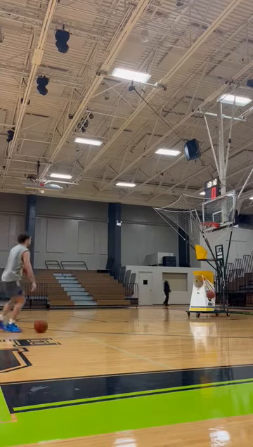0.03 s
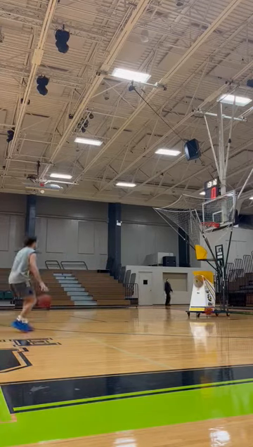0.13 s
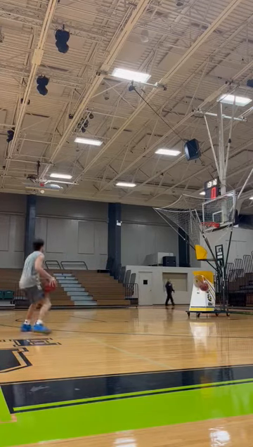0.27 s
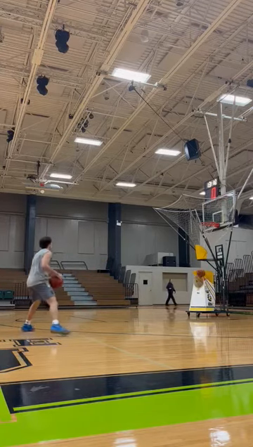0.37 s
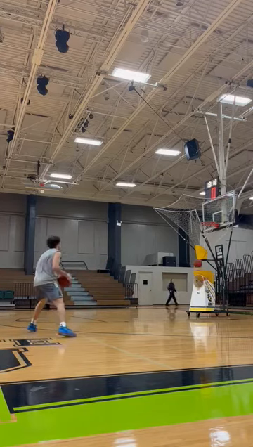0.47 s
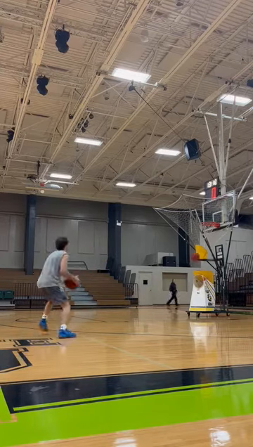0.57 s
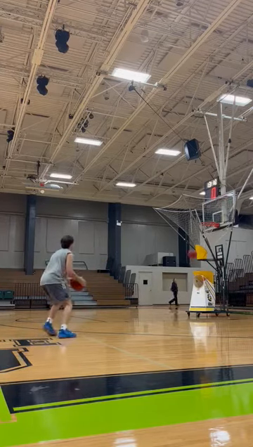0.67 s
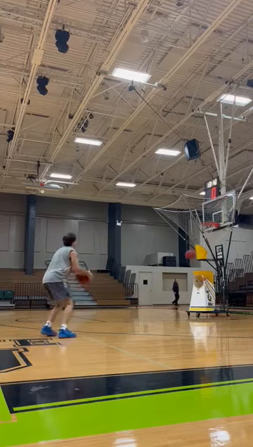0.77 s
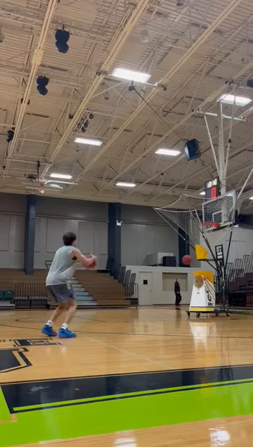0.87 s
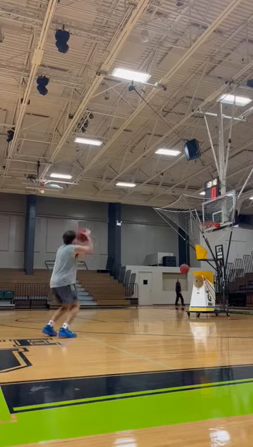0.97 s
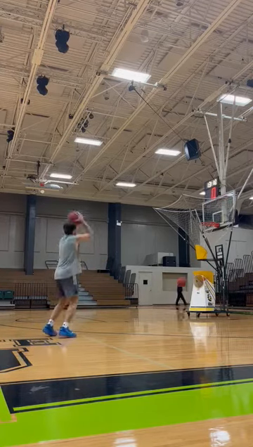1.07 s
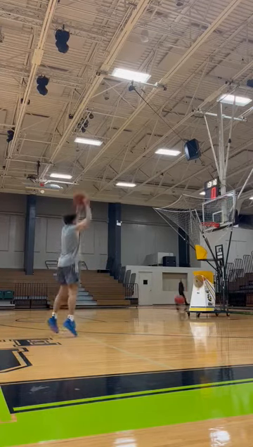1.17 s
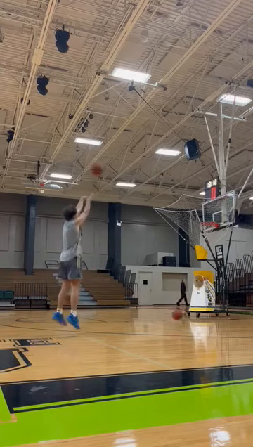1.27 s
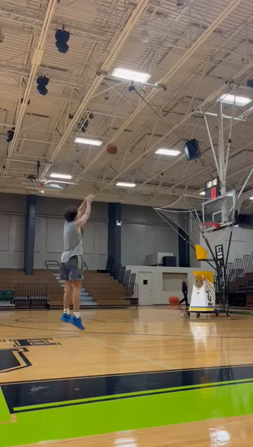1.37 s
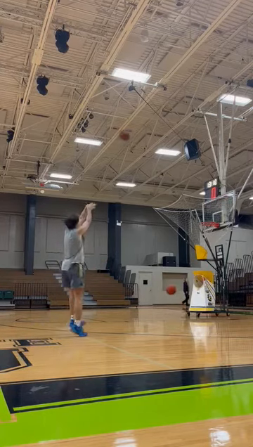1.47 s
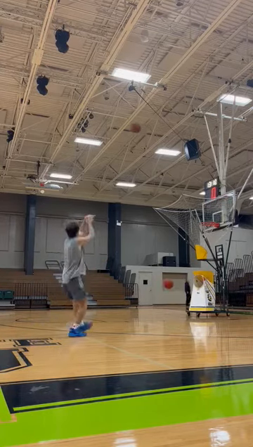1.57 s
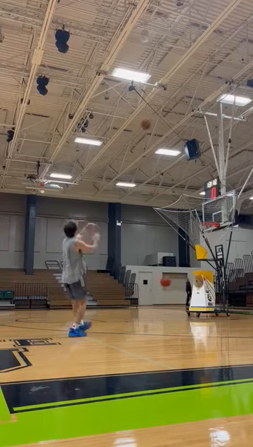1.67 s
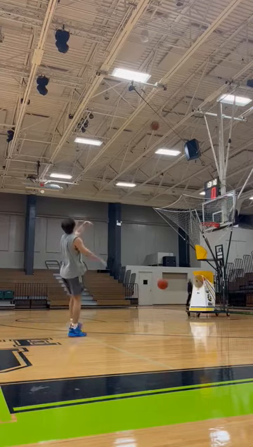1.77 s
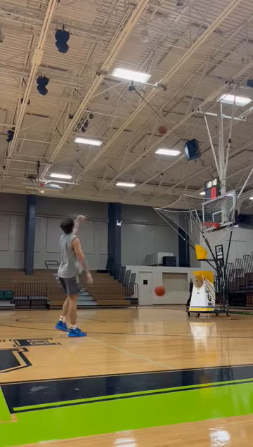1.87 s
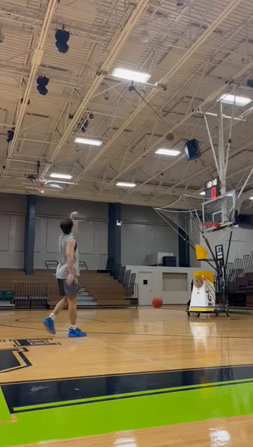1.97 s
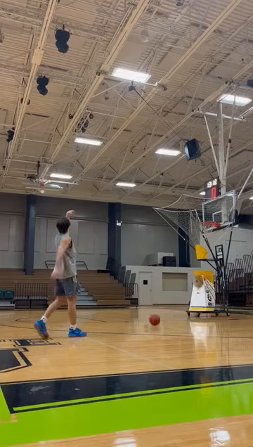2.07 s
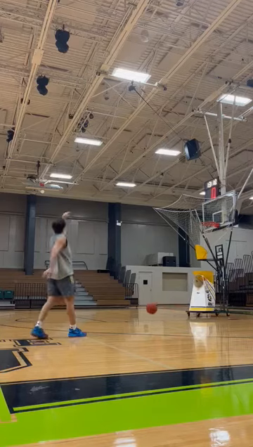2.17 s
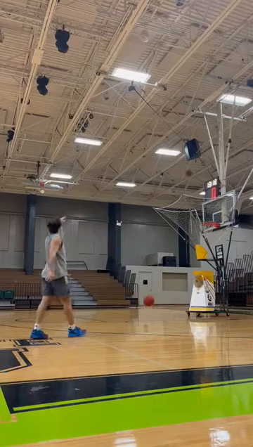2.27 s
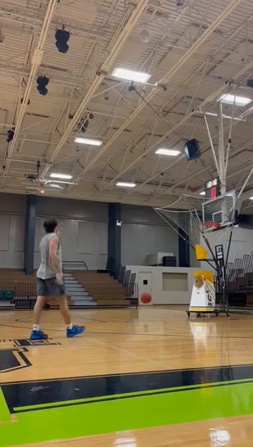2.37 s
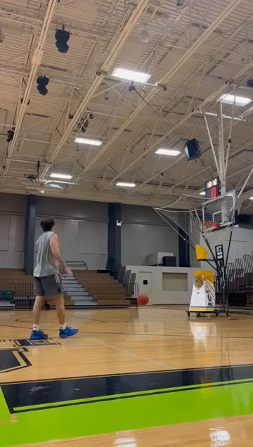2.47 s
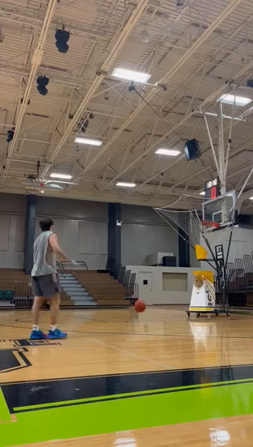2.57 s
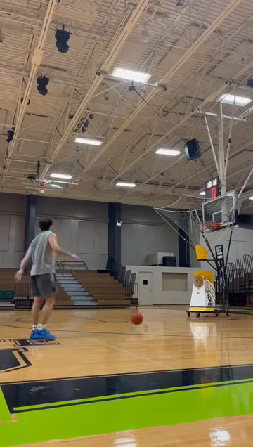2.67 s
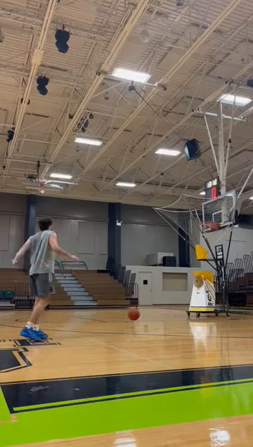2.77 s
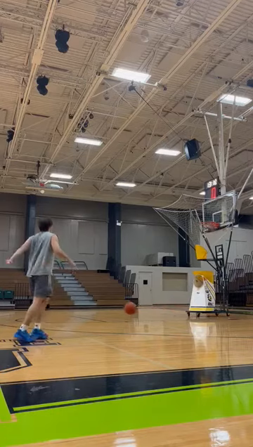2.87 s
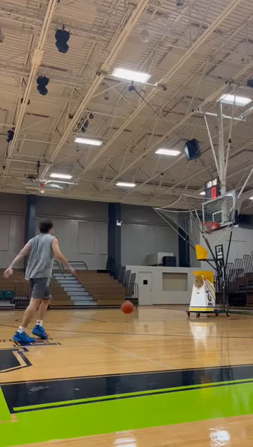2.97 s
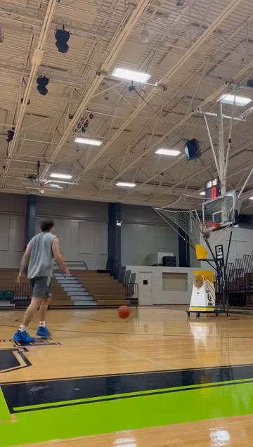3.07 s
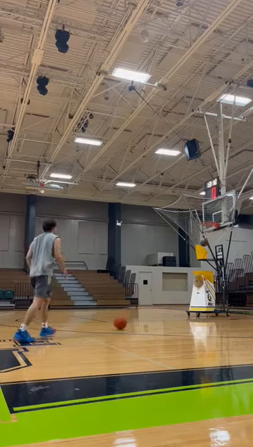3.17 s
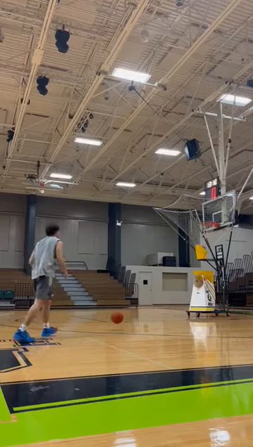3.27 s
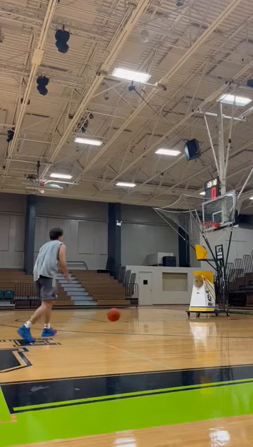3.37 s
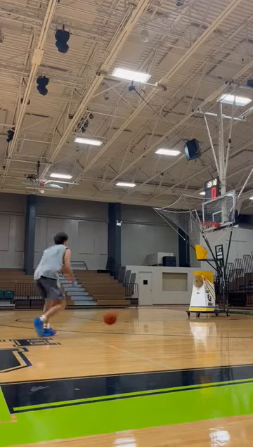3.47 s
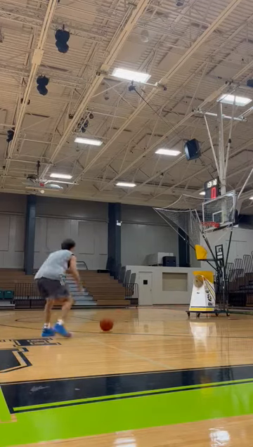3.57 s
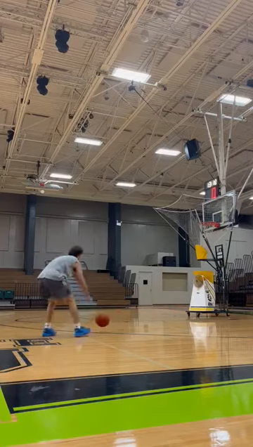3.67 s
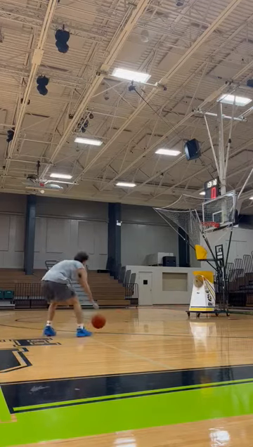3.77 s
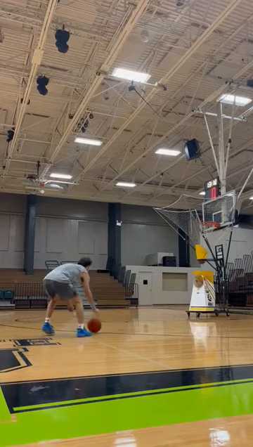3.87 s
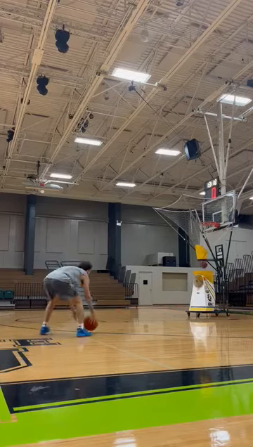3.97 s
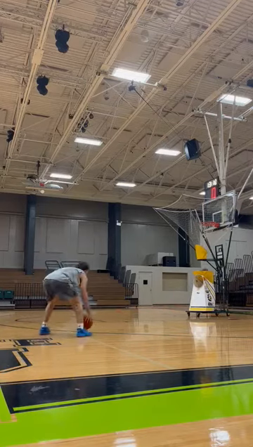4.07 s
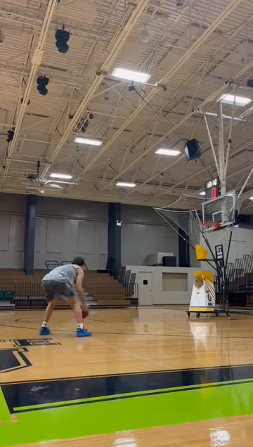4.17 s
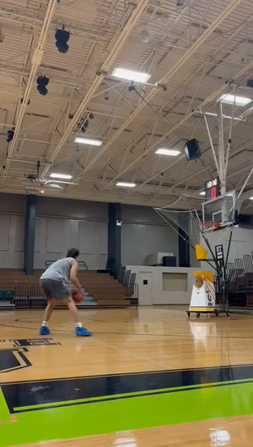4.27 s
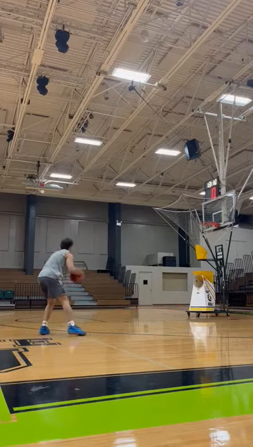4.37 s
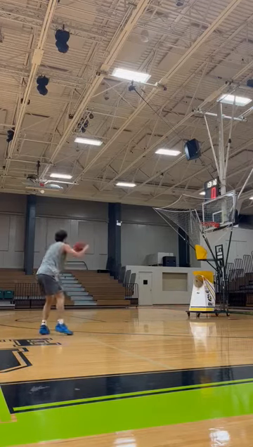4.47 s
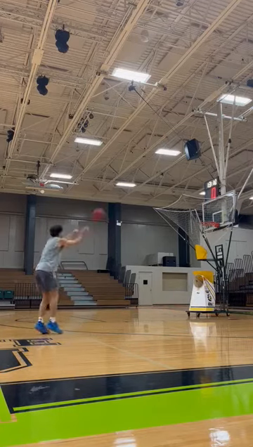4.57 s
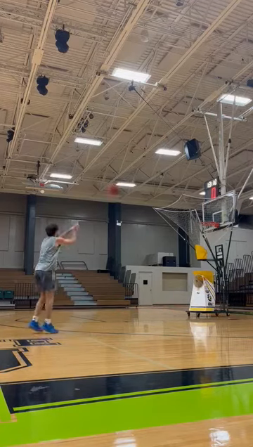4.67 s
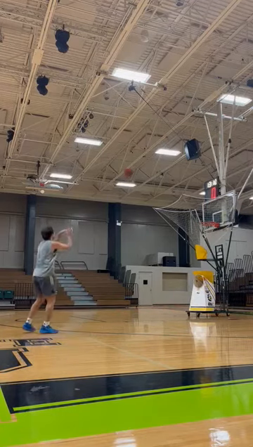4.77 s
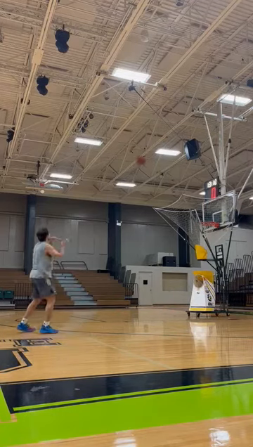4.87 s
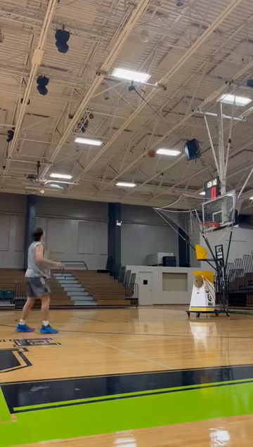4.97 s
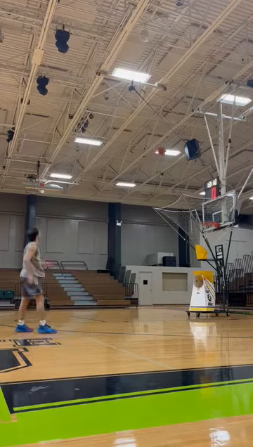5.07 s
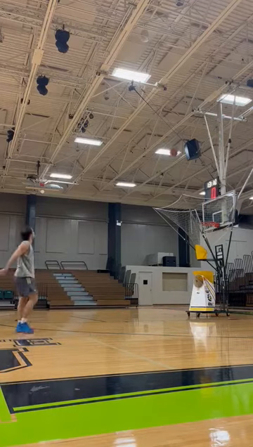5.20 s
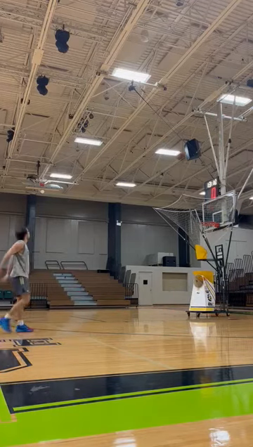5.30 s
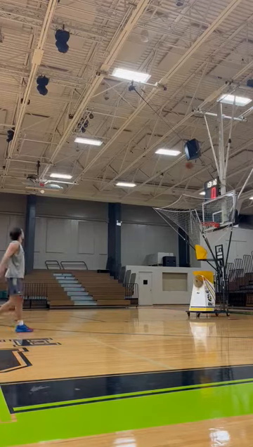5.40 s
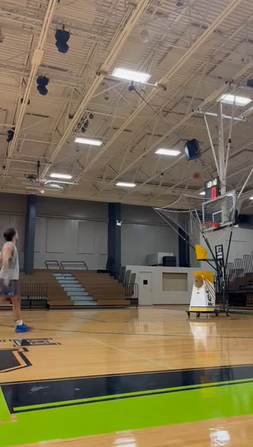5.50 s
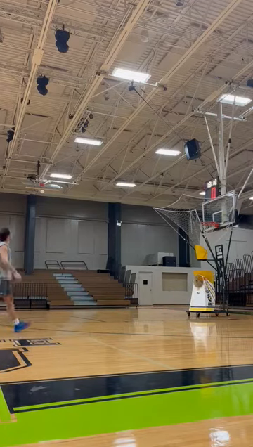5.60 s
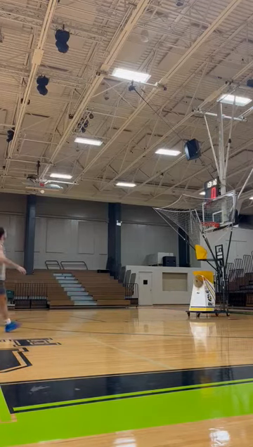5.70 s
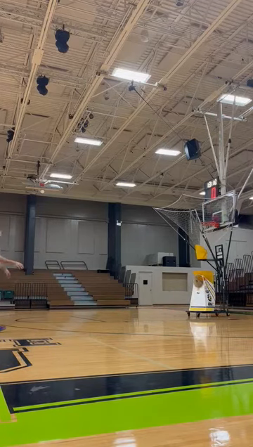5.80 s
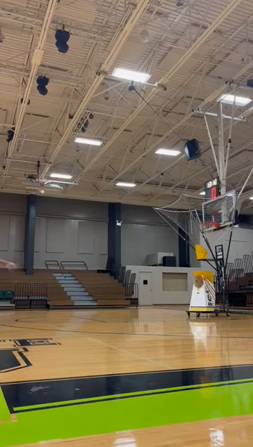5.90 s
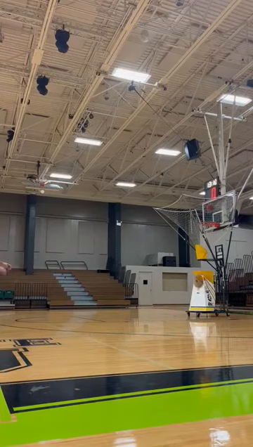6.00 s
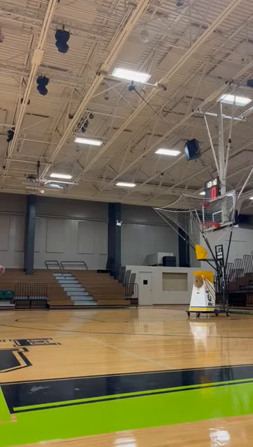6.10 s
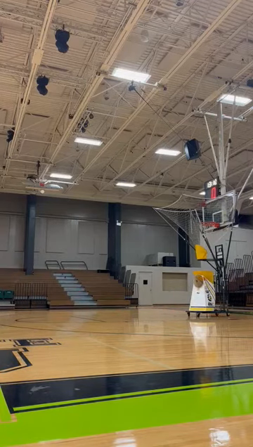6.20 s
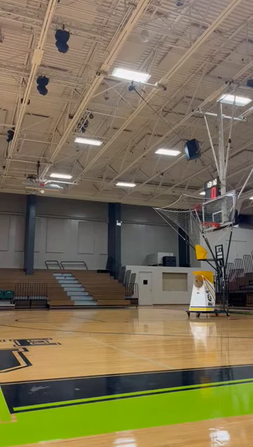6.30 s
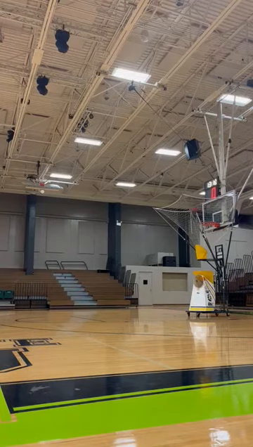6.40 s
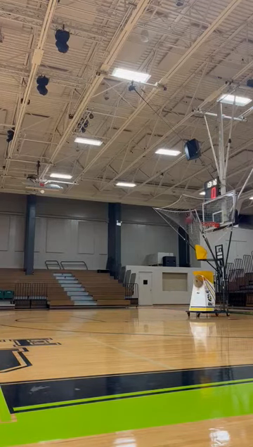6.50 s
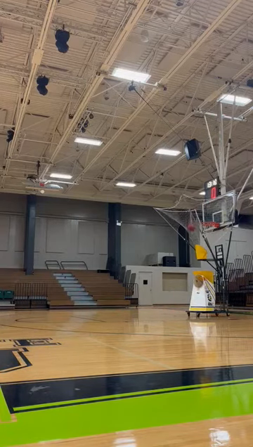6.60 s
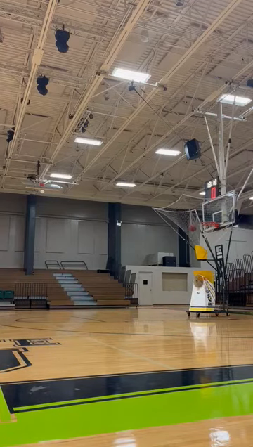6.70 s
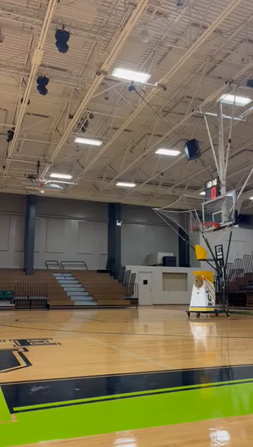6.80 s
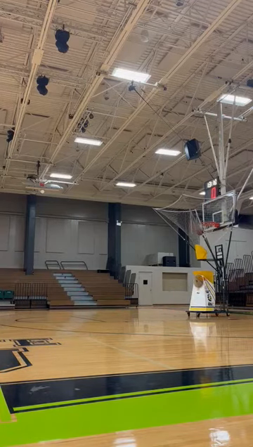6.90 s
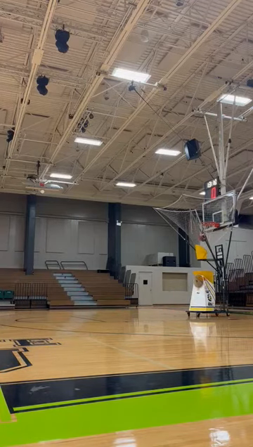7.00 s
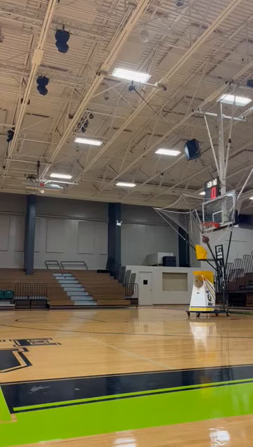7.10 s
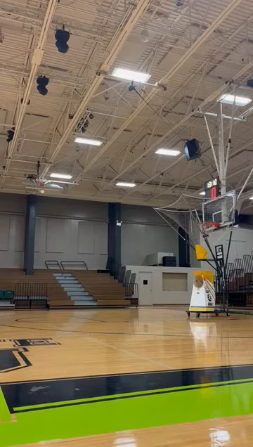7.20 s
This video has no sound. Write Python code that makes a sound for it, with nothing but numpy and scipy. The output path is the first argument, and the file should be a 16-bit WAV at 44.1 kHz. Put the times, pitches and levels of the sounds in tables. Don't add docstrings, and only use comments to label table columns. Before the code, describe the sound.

In a large, humming gym, a dribbled ball booms and echoes, a loose ball bounces farther off, and rubber soles chirp between soft footfalls.

```python
import sys
import numpy as np
from scipy import signal
from scipy.fft import rfft, irfft, next_fast_len
from scipy.io import wavfile
from scipy.ndimage import uniform_filter1d

SR = 44100
rng = np.random.default_rng(int(sys.argv[2]) if len(sys.argv) > 2 else 0)


def elevation(decibels):
    levels = np.asarray(decibels, float)
    return 10 ** (levels / 20)


def persist_wave(psi):
    counts = np.round(np.clip(psi, -1, 1) * 32767).astype(np.int16)
    wavfile.write(sys.argv[1], SR, np.atleast_2d(counts).T)


N = 319725
T = np.arange(N) / SR

# f/Hz, level/dB per Hz
AIR_SPECTRUM = [(13, -38), (25, -6.5), (50, -1), (80, 1.5), (133, -2), (222, -11), (429, -11), (852, -20.5),
                (2600, -30), (4440, -33.5), (6000, -39.5), (8000, -47), (10000, -52.5), (12400, -53)]
# f/Hz, level/dB
HUM_TONES = [(59.2, -47.5), (118.4, -47), (290.7, -56), (484.5, -65)]
AIR_DB = -39

# t/s, slap peak/dB, board thump/dB, lowest ball mode f/Hz, hall share/dB
BOUNCES = [
    (0.108, -11, -14.5, 1206, -2.5),
    (0.192, -11.5, -13, 1085, 3.5),
    (3.251, -27, -26.5, 1287, -4),
    (3.626, -29, -33, 1535, -1),
    (3.917, -34, -40.5, 1270, -2.5),
    (5.9, -26.5, -31, 1055, 3),
]
# t/s, slap peak/dB, thump/dB, lowest ball mode f/Hz, hall share/dB
CATCHES = [
    (0.486, -34, -33, 1007, -12.5),
    (0.536, -38, -31, 1180, -4),
    (0.735, -36, -27, 1066, -19),
    (2.768, -22, -21, 1603, -5.5),
]
# t/s, slap peak/dB, board thump/dB, lowest ball mode f/Hz, hall share/dB
LOOSE_BOUNCES = [
    (1.329, -12.5, -19, 1036, -1),
    (2.149, -22, -21, 1170, -4.5),
    (2.16, -26.5, -31.5, 1157, -2.5),
]
# t/s, slap peak/dB, thump/dB, lowest mode of the struck frame f/Hz, hall
# share/dB
FAR_KNOCKS = [(2.632, -32.5, -37, 1370, 9), (2.691, -33.5, -36.5, 1330, 13), (2.951, -29.5, -31.5, 880, 6),
              (5.916, -28.5, -38.5, 1370, 7.5), (7.196, -35, -47, 1540, -4)]
# f ratio, level/dB
BALL_MODES = [(1.001, 8), (1.598, -8.5), (2.17, -22), (2.899, -6.5), (3.901, -17.5)]
# f/Hz, level/dB, t60/s
PLANK_MODES = [(238, -6.5, 0.054), (594, -19, 0.088), (720, -39.5, 0.025)]
# f/Hz, level/dB
SLAP_SPECTRUM = [(200, 3.5), (450, -1.5), (700, -5), (1500, -4.5), (2500, -12), (4000, -21)]
# f/Hz, level/dB
CRACK_SPECTRUM = [(1500, -19), (3500, 6), (9000, 1), (12000, 8)]
VARNISH_CRACK_DB, LOOSE_CRACK_DB, STEEL_CRACK_DB, SKIN_CRACK_DB = -11, -16, -15.5, -27
BALL_RING, STEEL_RING = 0.098, 1

# f/Hz, level/dB, t60/s
HALL_DECAY = [(40, -3, 2.9), (70.2, 12, 1.5), (110, -2.5, 1.89), (254, 2, 2.2), (574, 10, 1.1),
              (1290, 2, 1.81), (2880, -1, 1.7), (4450, -2, 1.33), (8000, -6.5, 1.05), (12900, -16, .5)]
# t/s, level/dB, smear/s
CEILING_ECHOES = [(.034, -6, .0006), (.039, -8, .002), (.054, -10, .003)]
LUMPS_DB, LUMPS_S = 1.2, 0.25
GAP_S, GAP_DB = 0.031, -4

# t/s, peak/dB, f/Hz, hall
# share/dB
BOARD_KNOCKS = [(0.815, -27, 110.3, -8), (1.788, -37, 98, -3), (2.195, -16.5, 87, -21), (2.415, -57, 88, -9),
                (2.979, -23.5, 93, 0.5), (3.304, -40, 98, 4), (3.671, -37, 110, -2), (3.916, -35, 216, -6.5),
                (4.236, -48.5, 63, -15), (4.787, -48, 119.5, 11), (5.977, -27, 74, 9), (6.198, -29, 88, -17),
                (6.758, -34, 71.6, -18), (0.11, -14, 228, -13), (0.194, -20, 201, -10),
                (1.333, -25, 201, -12.5), (5.91, -23, 216.3, -6)]

# t/s, peak/dB, f/Hz, octave/dB, hall share/dB
SQUEALS = [(.201, -27.5, 4340, 5.5, -1), (.212, -34, 4287, -10, 12.5), (2.882, -33, 4210, -21, -1.5),
           (2.931, -30.5, 4230, -17, -9), (4.543, -38, 4420, -18, 2), (4.556, -31.5, 4370, -4.5, 4.5)]
SQUEAL_S, SQUEAL_GLIDE = 0.023, -0.019
WALL_GLIDE, WALL_OCTAVE_DB = 0.105, -4
# t/s, peak/dB, length/s, hall share/dB
CHIRPS = [(2.643, -47, 0.044, -13), (2.699, -38.5, 0.045, 6.5), (2.833, -34.5, .02, -5.5),
          (2.946, -33.5, 0.025, 5.5), (3.373, -50, 0.016, -11), (3.408, -28.5, 0.025, 1.5),
          (4.077, -56, 0.01, -4), (4.169, -49, 0.01, -1.5), (4.904, -59, 0.045, 0),
          (5.919, -35.5, 0.02, -2), (6.242, -51.5, 0.0082, 8), (6.589, -33.5, 0.014, 7),
          (6.684, -41, 0.0052, 9), (6.88, -47, 0.0072, 7), (7.15, -25, 0.029, 3), (7.178, -36, 0.045, 2),
          (7.243, -32, 0.0064, 0)]
# f/Hz, level/dB, t60/s
TREAD_MODES = [(1510, -6, .01), (2480, -3, .01), (3430, 0, .012), (4520, 2, .014), (6600, 3, .01),
               (8100, 0, .008), (9200, -2, .007)]
# f/Hz, level/dB
SOLE_SPECTRUM = [(600, -33.5), (1500, -6.5), (3400, -9), (4600, -7), (5700, -0.5), (6800, 7), (8200, 3),
                 (10500, 8), (13000, -43)]
TREAD_DB, TREAD_SCATTER = -23.5, 0.01

# start t/s, peak/dB, rise/s, fall/dB per s
RUSTLES = [(2.61, -47, 0.11, 26), (2.819, -47.5, .06, 59), (3.2, -61.5, 0.32, 30), (4.14, -55.5, 0.087, 29),
           (4.6, -59, .35, 63), (5.885, -46.5, .04, 110), (6.081, -65, 0.16, 93)]
# f/Hz, level/dB, t60/s
FRAME_MODES = [(277.8, -12, 0.55), (887.6, -5.5, 0.27), (1330, 19.5, 0.041)]
RUSTLE_TREBLE_DB, RUSTLE_BODY_DB, RUSTLE_START_DB = -20, 9.5, -6.5

# f/Hz, level/dB
PORT_SUM = [(4800, -1), (5400, -1.5), (5750, -10), (6600, -17.5), (7000, -5.5), (9000, -8), (9700, -21.5),
            (11500, -21), (12500, -57)]
# f/Hz, level/dB
PORT_DIFFERENCE = [(60, -55), (125, -60.5), (250, -26.5), (500, -8), (1200, -2.5), (1800, -7), (2500, 3),
                   (3400, -3.5), (4000, -5.5), (5600, 1), (6800, -5), (7500, -24), (8800, -14), (10200, -3),
                   (11500, -17.5), (12500, -59)]


def colour(x, table):
    hz, db = np.transpose(table)[:2]
    size = next_fast_len(x.shape[-1])
    f = np.maximum(np.fft.rfftfreq(size, 1 / SR), 1)
    gain = elevation(np.interp(np.log(f), np.log(hz), db))
    return irfft(rfft(x, size) * gain, size)[..., :x.shape[-1]]


def unit(x):
    return x / np.abs(x).max()


def modes(t, table):
    return sum(elevation(db - 60 * t / t60) * np.sin(2 * np.pi * hz * t) for hz, db, t60 in table)


def bands(count):
    size = next_fast_len(count)
    spec = rfft(rng.standard_normal((2, size)))
    octave = np.log2(np.maximum(np.fft.rfftfreq(size, 1 / SR), 1))
    for hz in 25 * 2 ** (np.arange(28) / 3):
        window = np.clip(1 - 3 * np.abs(octave - np.log2(hz)), 0, 1)
        yield hz, irfft(spec * window, size)[:, :count]


def walk(rate_hz):
    k = int(SR / rate_hz)
    held = np.repeat(rng.standard_normal(N // k + 1), k)
    return 1.3 * uniform_filter1d(uniform_filter1d(held, k), k)[:N]


def add(bus, start_s, sound, wet_db, far=None):
    i = int(start_s * SR)
    to_hall = sound if far is None else far
    pair = np.array([sound, elevation(wet_db) * to_hall])[:, :N - i]
    bus[:, i:i + pair.shape[1]] += pair


def ventilation():
    swell = walk(0.23)
    noise = sum(band * elevation(0.42 * swell + 0.32 * walk(4.1)) for _, band in bands(N))
    air = colour(noise, AIR_SPECTRUM)
    air = air * elevation(AIR_DB - 2.5) / air[0].std()
    hum = sum(elevation(db + 2.5 + 1.3 * walk(2.5)) * np.sin(2 * np.pi * hz * T) for hz, db in HUM_TONES)
    return air + [hum, 0.7 * hum]


def thump(t, low_hz, sweep_hz, sweep_s, t60_s, rise_s):
    turns = low_hz * t + sweep_hz * sweep_s * (1 - np.exp(-t / sweep_s))
    rise = (1 - np.exp(-t / rise_s)) ** 2
    return unit(np.sin(2 * np.pi * turns) * rise * elevation(-60 * t / t60_s))


def ball_hits(bus):
    t = T[:8192]
    contact = np.clip(t / 0.00011, 0, 1) * elevation(-60 * np.maximum(t - 0.0045, 0) / 0.04) * elevation(-400 * t)
    blow = np.arange(len(t)) == 128
    boards = thump(t, 64.8, 137.0, 0.01, 0.093, 0.0054)
    boards = boards + modes(t, PLANK_MODES) * np.clip(t / 0.0038, 0, 1)
    snap = thump(t, 245.0, 2024.0, 0.00318, 0.015, 0.0016)
    surfaces = ((BOUNCES, VARNISH_CRACK_DB, BALL_RING), (LOOSE_BOUNCES, LOOSE_CRACK_DB, BALL_RING),
                (FAR_KNOCKS, STEEL_CRACK_DB, STEEL_RING), (CATCHES, SKIN_CRACK_DB, BALL_RING))
    for hits, edge_db, ring_share in surfaces:
        for start_s, slap_db, thump_db, hz, wet_db in hits:
            phases = rng.random(len(BALL_MODES))
            ring = sum(elevation(db) * np.sin(2 * np.pi * (hz * ratio * t + phase))
                       for (ratio, db), phase in zip(BALL_MODES, phases))
            ring = elevation(slap_db - 8) * unit(ring) * (contact + ring_share * elevation(-60 * t / 0.14))
            slap, crack = rng.standard_normal((2, len(t))) * contact
            crack_db = slap_db + edge_db
            near = ring + elevation(slap_db - 4) * snap
            near = near + elevation(slap_db - 3) * unit(colour(slap, SLAP_SPECTRUM))
            near = near + elevation(crack_db + 13.0) * unit(colour(crack, CRACK_SPECTRUM))
            far = elevation(slap_db + 23) * colour(blow, SLAP_SPECTRUM)
            far = far + elevation(crack_db + 25.5) * colour(blow, CRACK_SPECTRUM)
            add(bus, start_s - 0.001, near, wet_db, far)
            add(bus, start_s, elevation(thump_db + 2.5) * boards, wet_db)


def hall(send):
    t = T[:120000]
    hz, db, t60_s = np.transpose(HALL_DECAY)
    tail = 0
    for f, band in bands(len(t)):
        band_db = np.interp(np.log(f), np.log(hz), db)
        band_t60_s = np.interp(np.log(f), np.log(hz), t60_s)
        tail = tail + band * elevation(band_db - 60 * t / band_t60_s)
    tail = elevation(-37) * tail * np.clip((t - 0.003) / 0.025, 0, 1) ** 0.068
    lumps_db = LUMPS_DB * walk(70)[:len(t)] * np.exp(-t / LUMPS_S)
    tail *= elevation(lumps_db + GAP_DB * (t < GAP_S))
    for k, (delay_s, echo_db, smear_s) in enumerate(CEILING_ECHOES):
        bump = np.exp(-((t - delay_s) / smear_s) ** 2 * 8)
        ports = np.array([[1], [(-1) ** k * 0.6]])
        tail += elevation(echo_db) * ports * bump / bump.sum()
    return signal.fftconvolve(send[None], tail, axes=1)[:, :N]


def board_knocks(bus):
    for start_s, db, hz, wet_db in BOARD_KNOCKS:
        add(bus, start_s, elevation(db) * thump(T[:8192], hz, 111.0, 0.0027, 0.068, 0.0024), wet_db)


def sole_squeals(bus):
    for start_s, db, hz, octave_db, wet_db in SQUEALS:
        u = np.linspace(0, 1, int(SQUEAL_S * SR))
        wobble = uniform_filter1d(rng.standard_normal(4096), size=60)[:len(u)]
        glide = np.outer([SQUEAL_GLIDE, WALL_GLIDE], u - 0.5 + 3 * wobble)
        turns = np.cumsum(hz * (1 + glide), axis=1) / SR
        octave = elevation(octave_db + np.array([[0], [WALL_OCTAVE_DB]])) * np.sin(4 * np.pi * turns)
        near, far = elevation(db) * (np.sin(2 * np.pi * turns) + octave) * np.sin(np.pi * u)
        add(bus, start_s - 0.003, near, wet_db, far)


def sole_chirps(bus):
    t = T[:2048]
    for start_s, db, length_s, wet_db in CHIRPS:
        tune = 1 + TREAD_SCATTER * rng.standard_normal(len(TREAD_MODES))
        blocks = [(hz * k, g, t60_s) for (hz, g, t60_s), k in zip(TREAD_MODES, tune)]
        tread = (t == 0) + elevation(TREAD_DB) * modes(t, blocks)
        u = np.linspace(0, 1, max(int(length_s * SR), 64))
        scrape = rng.standard_normal(4096)[:len(u)] * np.sin(np.pi * u ** 0.5)
        chirp = unit(colour(signal.fftconvolve(scrape, tread), SOLE_SPECTRUM))
        add(bus, start_s - 0.002, elevation(db + 7.5) * chirp, wet_db)


def rustle(bus):
    grains = rng.standard_normal(N) * elevation(2.5 * walk(50) + 3 * walk(300))
    cord = colour(grains, [(900, -5.0), (1500, -0.5), (4500, -2.0), (6500, -5)])
    treble = colour(grains, [(4500, -21.0), (6500, -30.0), (12000, -9)])
    body = colour(grains, [(130, -18), (220, 6.0), (400, 4), (900, -9.5), (1500, -29.5)])
    body = body + elevation(-36.5) * signal.fftconvolve(body, modes(T[:16384], FRAME_MODES))[:N]
    shake = 0
    for start_s, db, rise_s, fall_db_per_s in RUSTLES:
        age = T - start_s
        swell_db = RUSTLE_START_DB * np.clip(1 - age / rise_s, 0, 1)
        fall_db = fall_db_per_s * np.maximum(age - rise_s, 0)
        shake = shake + np.clip(age / 0.02, 0, 1) * elevation(db + swell_db - fall_db)
    layers = ((cord, 5.5), (treble, RUSTLE_TREBLE_DB), (body, RUSTLE_BODY_DB - 6.5))
    add(bus, 0, shake * sum(elevation(db) * layer / layer.std() for layer, db in layers), -2)


def scene():
    bus = np.zeros((2, N))
    for source in (ball_hits, board_knocks, sole_squeals, sole_chirps, rustle):
        source(bus)
    direct, send = bus
    late = signal.hilbert(direct, next_fast_len(N))[:N].imag
    mid, side = hall(send) + ventilation() + [direct, 0.12 * direct + 0.73 * late]
    return np.array([mid + side, mid - side])


def top_cut(x):
    return signal.sosfilt(signal.butter(12, 13050, fs=SR, output="sos"), x)


def record(dry):
    mid = colour((dry[0] + dry[1]) / 2, PORT_SUM)
    side = colour((dry[0] - dry[1]) / 2, PORT_DIFFERENCE)
    return top_cut(np.array([mid + side, mid - side]))


dry = scene()
out = record(dry)
persist_wave(out)
```